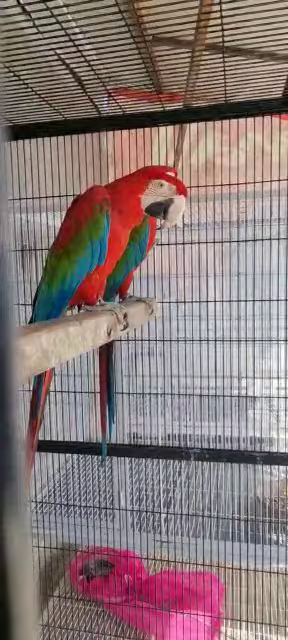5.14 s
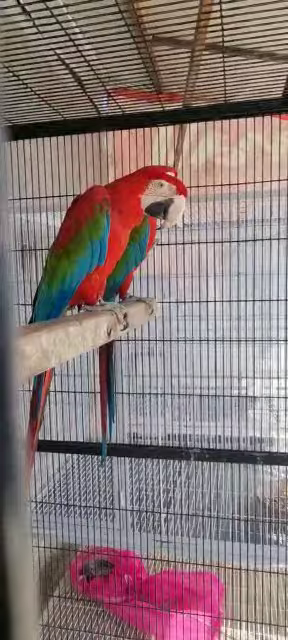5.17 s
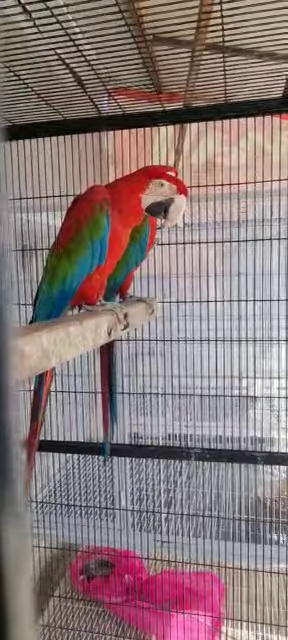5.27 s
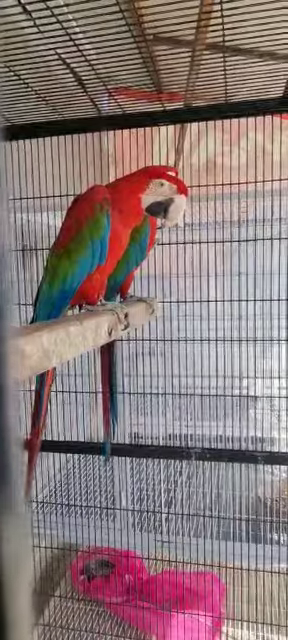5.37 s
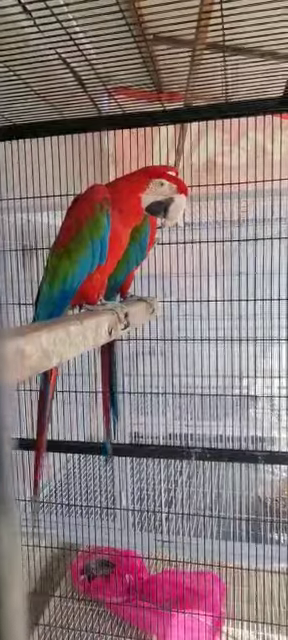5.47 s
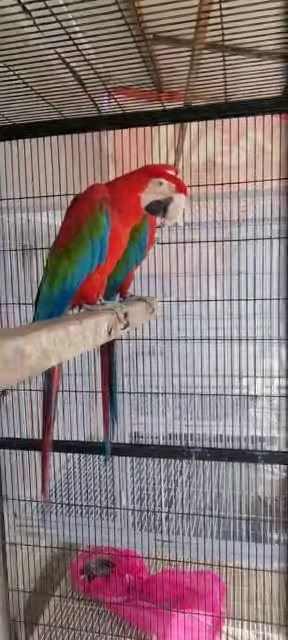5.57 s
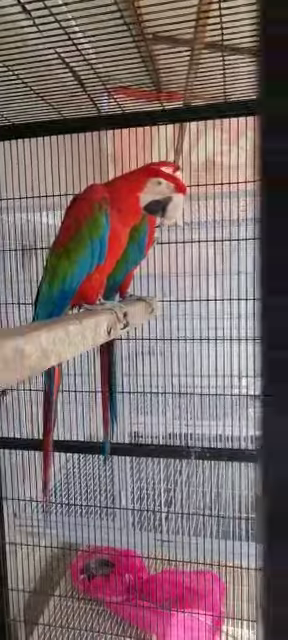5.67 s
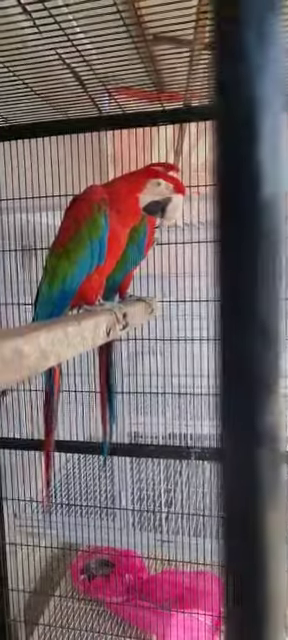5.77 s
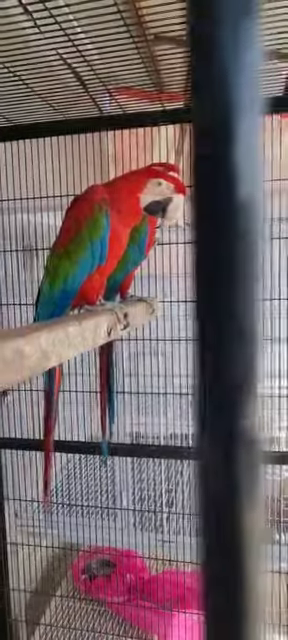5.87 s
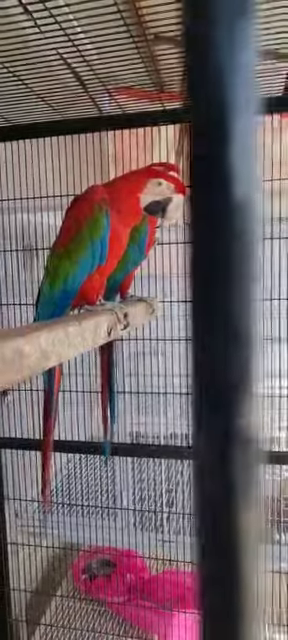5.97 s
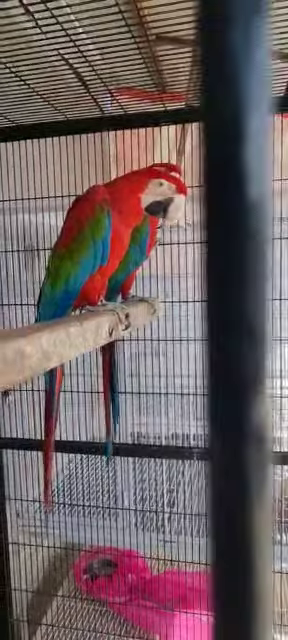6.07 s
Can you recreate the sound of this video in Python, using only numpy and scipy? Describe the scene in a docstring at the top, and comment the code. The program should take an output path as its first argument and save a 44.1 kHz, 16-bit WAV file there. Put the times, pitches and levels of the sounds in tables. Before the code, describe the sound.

Quiet ticks and scrapes on cage wire open the scene, then two harsh macaw screeches ring off the walls. Low throaty barks erupt near the microphone, three quick screeches follow, and three spaced, forced rasps burst and fade. Hoarse distant caws and growls thicken toward the end, with a thin fast trill. Steady low air and an unsteady hum lie underneath, in stereo.

```python
"""Macaws call in a hard-walled aviary: unstable syrinx tones, coloured by the throat, slide down in pitch as they swell.
Later screeches burst from a thin note into a rasp, where the tone gives way to noise pulsing once a cycle.
One bird barks low and loud close by; others croon, caw, whistle and growl farther off.
Beaks and claws scrape the wire as short filtered noise, a small bird trills faintly on sine tones,
and ventilation is coloured noise with a low, unsteady hum."""
import sys
import numpy as np
from scipy import signal
from scipy.fft import rfft, irfft, next_fast_len
from scipy.io import wavfile
from scipy.ndimage import uniform_filter1d, minimum_filter1d, map_coordinates

SR = 44100
rng = np.random.default_rng(int(sys.argv[2]) if len(sys.argv) > 2 else 0)


def file_out(sig):
    """Save sig as 16-bit WAV at sys.argv[1]."""
    # one column per channel
    cols = np.atleast_2d(sig).T
    # limit, then scale
    lim = np.clip(cols, -1, 1)
    pcm = np.round(lim * 32767).astype(np.int16)
    wavfile.write(sys.argv[1], SR, pcm)


N = 270769
TIME = np.arange(N) / SR
TOP_HZ = 15780  # band limit

# Call levels are set before flutter, room and ports; roughness runs from 0 (clean) to 1 (chaotic).
# Screeches that slide down and swell: (time [s], length [s], swell [s], peak level [dB], settled pitch [Hz],
# slide from above [Hz], roughness approached after the break [0-1], odd harmonics [dB],
# brightness [dB per octave], left over right [dB])
SCREECHES = [ (1.138, 0.19, 0.13, -18.5, 1275, 482.7, 0.9, -5.5, 4, 0),
             (1.471, .21, 0.11, -18, 1288, 341, 0.8, -6, 3, 0),
             (2.581, .21, 0.092, -20.5, 1318, 111, 0.83, 0.5, 5, 0),
             (2.82, 0.12, 0.092, -24.5, 1292, 857, 0.2, -22, -3.5, 0),
             (2.967, 0.264, 0.1, -21, 1249, 377.5, 0.53, -5, 4, -1),
             (5.303, 0.363, 0.31, -34, 1359, 100, 0.34, -2, -4.5, 0)]
SLIDE_S = .038  # time to slide half way [s]
SWELL_DB, FADE_DB_PER_S = 9, 90  # rise to the peak [dB], fall after it [dB/s]
START_ROUGH = 0.062  # roughness before the break [0-1]
BREAK_AT, BREAK_SHARPNESS = 0.863, 3.14  # middle of the break [share of the swell], its abruptness

# Screeches forced into a rasp: (time of the break [s], length after it [s], peak level [dB], fade [dB/s],
# settled pitch [Hz], odd harmonics [dB], brightness [dB per octave], left over right [dB])
RASPS = [ (3.495, 0.39, -21, 47, 1322, -22, 1, 1.5), (4.188, 0.36, -18.5, 54.5, 1325, -8, 0, 1),
         (4.902, 0.38, -19.5, 36.5, 1322, -9, 1.5, 0)]
# The thin lead note: length [s], level against the rasp [dB], slide from above [Hz]
LEAD_S, LEAD_DB, LEAD_SLIDE_HZ = 0.029, -13.5, 244.7
BURST_S, ROUGHEN_S = 0.0077, 0.033  # time constants of the burst and of the turn to noise [s]

# Gliding calls, all with the same columns: (time [s], length [s], peak level [dB], first pitch [Hz],
# last pitch [Hz], roughness [0-1])
# Close barks
SQUAWKS = [(2.23, 0.16, -22, 490, 587.5, 0.8), (2.345, .13, -11, 600, 509.4, 0.24),
           (2.46, .08, -9, 682.3, 523.7, 0.62)]
# Distant soft, low calls, columns as above
CROONS = [(1.42, 0.6, -43, 295.8, 352.5, 0.41), (1.94, 0.24, -28, 364.8, 316.2, 0.17),
          (2.12, .23, -34, 342.4, 405.7, 0.6), (4.64, 0.2, -41.5, 392, 325, 0.15)]
# Distant hoarse calls, columns as above; the first row is the second harmonic of the croon at 4.64 s, voiced
# through the caws' throat
CAWS = [(4.64, 0.32, -36.5, 745, 630, 0.41), (4.92, 0.41, -27, 531.6, 570, 0.58),
        (5.24, .43, -28.5, 582.4, 530, 0.66), (6.08, 0.067, -25, 539, 470, 0.6)]
# Distant high, breathy calls, columns as above
WHISTLES = [(-.08, 0.168, -36, 1471, 1416, 0.6), (3.88, .34, -35.5, 1492, 1436, 0.6)]

# Throat colour of the screeches: (frequency [Hz], relative level [dB])
SCREECH_THROAT = [(600, -34), (1050, -10), (1420, -5), (1700, -7), (2020, 10), (2300, -0.5), (2720, 7.5),
                  (3050, -5), (3550, -1), (4200, -9.5), (4900, -14), (5600, -12.5), (6300, -19),
                  (7300, -24), (8300, -43.5), (10500, -44.5), (13000, -32.5), (16000, -54.5)]
# Throat colour of the rasps: (frequency [Hz], relative level [dB])
RASP_THROAT = [(600, -43), (1100, -32), (1420, 0), (1700, -6.5), (2020, 7), (2300, 6), (2720, 5.5),
               (3000, 5), (3500, -3.5), (4200, -9), (4900, -11), (5600, -10.5), (6300, -8.5), (7200, -17),
               (8300, -44.5), (10500, -35.5), (13000, -39), (16000, -48.5)]
# Throat colour of the squawks: (frequency [Hz], relative level [dB])
SQUAWK_THROAT = [(150, -34), (350, -9.5), (560, -16), (800, 0.5), (1130, -1), (1600, -6), (2200, -2),
                 (2650, -6), (3200, -6), (3700, -19), (4200, -21.5), (5200, -23.5), (6600, -20.5),
                 (8300, -36.5), (13000, -23.5), (16000, -45.5)]
# Throat colour of the croons: (frequency [Hz], relative level [dB])
CROON_THROAT = [(200, -21.5), (350, -2.5), (500, 0.5), (720, -12), (1020, 4), (1300, -28), (1600, -9.5),
                (2200, -24.5), (2800, -10.5), (4000, -39), (8000, -24.5)]
# Throat colour of the caws: (frequency [Hz], relative level [dB])
CAW_THROAT = [(250, -37.5), (560, -2), (800, 3.5), (1100, 9), (1350, -0.5), (1650, -3.5), (2200, -31.5),
              (2750, -10), (3100, -5), (3500, -19), (4100, -11.5), (4800, -30), (8000, -39.5)]
# Throat colour of the whistles: (frequency [Hz], relative level [dB])
WHISTLE_THROAT = [(700, -16), (1400, 0.5), (2300, -18.5), (6000, -26)]

# Growls through a wide beak: (time [s], length [s], peak level before the room [dB])
GROWLS = [(0.83, 0.27, -47), (2.022, 0.34, -30.5), (3.473, 0.45, -33.5), (4.23, 0.4, -34),
          (4.67, 0.34, -31), (4.894, 0.91, -28), (5.23, 0.37, -25), (5.741, 0.018, -32.5)]
# The flock's grumble through nearly shut beaks: (time [s], level before the room [dB])
GRUMBLE = [(.8, -63), (1.4, -42), (3.4, -39.5), (4.1, -47), (5.6, -38.5), (6.14, -42.5)]
# Growl resonances, beak wide, per pass: (centre [Hz], width [Hz], relative level [dB])
BEAK_WIDE = [(522, 260, -4), (1223, 290, 6), (1671, 200, 5), (2660, 470, 4), (4010, 330, -0.5),
             (5180, 420, -2)]
# Growl resonances, beak nearly shut, per pass: (centre [Hz], width [Hz], relative level [dB])
BEAK_NARROW = [(260, 180, -2), (525.4, 213, 3), (1135, 640, 5), (1512, 440, 6.5), (2620, 600, -5),
               (4000, 1400, -27), (5200, 500, -6.5)]

# Scrapes on the wire: (time [s], fade time [s], low ring before the room [dB], bright hiss before the room [dB])
SCRAPES = [(0.039, .1, -50, -62), (0.182, 0.12, -51, -57.5), (0.31, 0.028, -38.5, -47),
           (0.629, 0.022, -43.5, -53), (0.671, 0.079, -41.5, -39.5), (0.812, 0.14, -42.5, -66.5),
           (1.892, 0.055, -38.5, -55), (2.029, 0.066, -46.5, -47), (2.192, 0.029, -34.5, -40),
           (2.284, 0.025, -36.5, -63), (2.848, 0.02, -25.5, -44), (3.221, 0.12, -46.5, -56),
           (3.463, 0.027, -38, -43.5), (3.815, 0.085, -36, -39), (3.872, 0.025, -27.5, -36.5),
           (4.112, 0.012, -42, -48.5), (4.278, 0.087, -33, -49), (5.636, 0.0048, -36, -45.5)]
# Colour of the wire's low ring: (frequency [Hz], relative level [dB])
WIRE_RING = [(600, -88), (2000, -2), (3800, -4), (5700, 2), (7300, -1.5), (8500, -23.5), (16000, -53)]
# Colour of the wire's bright hiss: (frequency [Hz], relative level [dB])
WIRE_HISS = [(4000, -77.5), (8000, 0.5), (11000, 5.5), (14000, 10.5), (16000, 5.5)]

# Loudness of the small bird's trill: (time [s], level before the room [dB])
TRILL = [(4.55, -66), (4.68, -51.5), (5.2, -63), (5.5, -71), (5.72, -48.5), (6.14, -57)]

# Colour of the ventilation: (frequency [Hz], relative level [dB])
AIR = [(12, -60.5), (30, -18), (55, -2), (100, -4), (150, -7.5), (290, -4), (450, -8.5), (750, -12.5),
       (1200, -8.5), (2000, -15.5), (4500, -22), (7000, -25), (9000, -44), (15500, -28)]
# Width of the ventilation: (frequency [Hz], left-right likeness [0-1])
AIR_ALIKE = [(30, 0.55), (80, 0.86), (200, 0.98), (400, 0), (8000, 0)]

# Decay of the room by 60 dB: (frequency [Hz], time [s])
ROOM_T60 = [(200, 0.71), (1000, 0.44), (3000, 0.59), (6000, 0.46), (13000, 0.11)]
# Width of the room's answer: (frequency [Hz], left-right likeness [0-1])
ROOM_ALIKE = [(200, 0.47), (1400, 0.25), (3000, 0.014), (6000, 0)]
# Phase between the microphone ports: (frequency [Hz], left lead [rad])
PORT_PHASE = [(330, 0.75), (520, 1.77), (1250, 2.14), (2300, 1.19), (2900, 2.14), (4000, 1.35),
              (9000, 1.68)]
# Balance between the microphone ports: (frequency [Hz], left over right [dB])
PORT_BALANCE = [(200, -1), (1400, -3.5), (2800, 0.5), (5200, -5.5), (7000, -1), (9000, 3.5), (15000, 0)]


def amp(db):
    """Decibels to gain."""
    return 10 ** (np.asarray(db) / 20)


def unit(x):
    """Scale to rms 1."""
    return x / np.sqrt(np.mean(x ** 2) + 1e-20)


def along(points, hz):
    """Read (Hz, value) points on a log axis."""
    f, v = np.transpose(points)
    return np.interp(np.log(hz + 1), np.log(f + 1), v)


def curves(rows, t):
    """Each column after the time, read at times t."""
    s, *cols = np.transpose(rows)
    return [np.interp(t, s, c) for c in cols]


def wobble(rate, size):
    """A smooth random curve with rate knots a second."""
    knots = rng.standard_normal(2048)
    return map_coordinates(knots, [np.arange(size) * rate / SR], mode="wrap")


def filtered(x, response):
    """x through a complex response of frequency."""
    m = next_fast_len(x.shape[-1] + 8192)
    spectrum = rfft(x, m) * response(np.fft.rfftfreq(m, 1 / SR))
    return irfft(spectrum, m)[..., :x.shape[-1]]


def coloured(x, spectrum):
    """x with a (Hz, dB) colour, at rms 1."""
    return unit(filtered(x, lambda hz: amp(along(spectrum, hz))))


def resonated(x, modes):
    """x twice through a set of resonances, for dark valleys between them; at rms 1."""
    def once(f):
        total = 0
        for k, (centre, width, db) in enumerate(modes):
            peak = 1j * f * width / (centre * centre - f * f + 1j * f * width)
            total = total + (-1) ** k * amp(db) * peak  # neighbours in opposite sign
        return total
    return unit(filtered(x, lambda f: once(f) ** 2))


def noise_pair(alike, size):
    """Left and right noise, partly shared."""
    def weights(hz):
        turn = np.arccos(np.clip(along(alike, hz), -1, 1)) / 2
        return np.array([np.cos(turn), np.sin(turn)])
    mid, side = filtered(rng.standard_normal((2, size)), weights)
    return np.array([mid + side, mid - side])


def panned(x, pan_db):
    """x in two channels, the left louder by pan_db."""
    return amp([[pan_db / 2], [-pan_db / 2]]) * x


def slide(age):
    """The share of its downward slide that a call still has before it: fast at first, then settling."""
    return 1 / (1 + age / SLIDE_S)


def arch(progress, droop_db):
    """Level in dB of a call that peaks midway and is droop_db lower at both ends."""
    return -droop_db * (2 * progress - 1) ** 2


def call(t, pitch, db, rough, throat, jitter, rasp, flutter_db, count,
         odd_db=0, bright_db=0, flap_rate=110, flap_db=6):
    """One call over times t: a syrinx tone that, pushed hard, splits into thirds of its pitch and turns chaotic."""
    size = len(t)
    rough = np.clip(rough, 0, 1)
    rough_waver = wobble(600, size) + 0.385 * wobble(69.75, size)
    waver = 0.0081 * wobble(120.2, size) + jitter * rough * rough_waver
    phase = 2 * np.pi * np.cumsum(pitch * (1 + waver)) / SR

    # high harmonics build up later
    k = np.arange(1, count + 1)[:, None]
    build = 1 - np.exp(-(t - t[0]) / (.007 * (k * pitch / 3000) ** 3))
    strength = build * amp(odd_db * (k % 2)) * (k * pitch < TOP_HZ)

    # the membranes flap unevenly: each harmonic swells and slips on its own, slipping more the higher it is
    flaps = np.array([[wobble(flap_rate, size) for _ in k] for _ in range(2)])
    swell, slip = np.sqrt(rough) * flaps
    lag = 2 * np.pi * rng.random((count, 1)) + (.6 + .12 * k) * slip
    tone = unit(np.sum(strength * amp(flap_db * swell) * np.cos(k * phase + lag), axis=0))
    # beating at two thirds of the pitch puts partials between the harmonics
    tone *= 1 + np.sqrt(rough) * np.clip(4 * rough, 0, 1) * np.cos(phase * 2 / 3)

    # air bursts through once a cycle
    breath = np.resize(rng.standard_normal(SR), size)
    chaos = unit(breath * (1 + .5 * np.cos(phase)))
    share = np.clip(rasp * rough ** 2, 0, 1)
    source = np.sqrt(1 - share) * tone + np.sqrt(share) * chaos

    colour = [(hz, level + bright_db * np.log2(hz / throat[0][0])) for hz, level in throat]
    voice = coloured(source, colour)
    voice /= np.sqrt(np.abs(uniform_filter1d(voice ** 2, size=900)) + 1e-6)  # even out the level

    # the rasp comes in uneven puffs
    puffs = amp(flutter_db * np.sqrt(rough) * (wobble(191.8, size) - 0.91))
    gate = np.clip((t - t[0]) / .002, 0, 1) * np.clip((t[-1] - t) / .02, 0, 1)
    heard = (voice * puffs * gate * amp(db))[t >= 0]
    return np.pad(heard, (max(round(t[0] * SR), 0), N))[:N]


def glides(rows, throat, droop_db, **voice):
    """Short calls that swell and sink while their pitch glides evenly."""
    out = np.zeros(N)
    for s, length, db, first_hz, last_hz, rough in rows:
        age = np.arange(0, length, 1 / SR)
        pitch = first_hz + (last_hz - first_hz) * age / length
        level = db + arch(age / length, droop_db)
        out += call(s + age, pitch, level, rough, throat, **voice)
    return out


def ventilation():
    """Steady moving air as coloured noise, with a low hum that wavers in pitch and level."""
    hum_phase = 2 * np.pi * np.cumsum(77 + 3 * wobble(15, N)) / SR
    hum = np.sin(hum_phase) * amp(3.5 * wobble(14, N))
    air = coloured(noise_pair(AIR_ALIKE, N), AIR)
    return amp(-52.0) * air + amp(-60.5) * hum


def far_calls():
    """Farther birds croon, caw and whistle: one syrinx model through three throats."""
    croons = glides(CROONS, CROON_THROAT, droop_db=6, jitter=.04, rasp=.25, flutter_db=4, count=16)
    caws = glides(CAWS, CAW_THROAT, droop_db=7, jitter=.08, rasp=.5, flutter_db=3.5, count=12)
    whistles = glides(WHISTLES, WHISTLE_THROAT, droop_db=12.5, jitter=0.085, rasp=1.0, flutter_db=4, count=3)
    return croons + caws + whistles


def growling():
    """Uneven low pulses of noise: a grumble through nearly shut beaks, and growls through wide ones."""
    phase = 2 * np.pi * np.cumsum(130 * (1 + 0.22 * wobble(90, N))) / SR
    pulses = rng.standard_normal(N) * np.exp(np.cos(phase)) * amp(1.5 * wobble(45, N))
    pulses = coloured(pulses, [(100, -4.5), (280, 6.0), (5500, -13), (8500, -11)])
    swells = [amp(db + arch((TIME - s) / length, droop_db=9.5)) for s, length, db in GROWLS]
    growls = np.max(swells, axis=0)  # the loudest growl leads
    grumble = amp(curves(GRUMBLE, TIME)[0])
    return growls * resonated(pulses, BEAK_WIDE) + grumble * resonated(pulses, BEAK_NARROW)


def scrapes():
    """Beaks and claws catch on the wire and slide off in tiny slips: noise through a ring and a hiss."""
    out = np.zeros(N + SR)
    t = np.arange(SR // 3) / SR
    for s, length, ring_db, hiss_db in SCRAPES:
        slips = rng.standard_normal(len(t)) * amp(3.4 * wobble(500, len(t)))
        stroke = (1 - np.exp(-t / .002)) * np.exp(-(t / length) ** 2)
        ring = amp(ring_db) * coloured(slips, WIRE_RING)
        hiss = amp(hiss_db) * coloured(slips, WIRE_HISS)
        out[round(s * SR):][:len(t)] += stroke * (ring + hiss)
    return out[:N]


def screeches():
    """High screeches from a strained syrinx: they slide down, swell, roughen near the peak and fade."""
    out = np.zeros((2, N))
    for s, length, swell_s, db, hz, slide_hz, final_rough, odd_db, bright_db, pan_db in SCREECHES:
        age = np.arange(0, length, 1 / SR)
        rise = -SWELL_DB * np.maximum(1 - age / swell_s, 0) ** 2
        fall = -FADE_DB_PER_S * np.maximum(age - swell_s, 0)
        strain = (age / (BREAK_AT * swell_s)) ** BREAK_SHARPNESS
        rough = (START_ROUGH + final_rough * strain) / (1 + strain)
        voice = call(s + age, hz + slide_hz * slide(age), db + rise + fall, rough, SCREECH_THROAT,
                     jitter=.055, rasp=.9, flutter_db=2.5, count=10, odd_db=odd_db, bright_db=bright_db)
        out += panned(voice, pan_db)
    return out


def squawks():
    """The close bird's low, open-beaked barks; their partials break up and trade strength."""
    return glides(SQUAWKS, SQUAWK_THROAT, droop_db=8, jitter=.06, rasp=.7, flutter_db=2.5, count=28,
                  odd_db=-3, flap_rate=45, flap_db=10)


def rasps():
    """The screeching voice forced: a thin lead note bursts into a long, fading rasp."""
    out = np.zeros((2, N))
    for s, length, db, fade_db_per_s, hz, odd_db, bright_db, pan_db in RASPS:
        age = np.arange(-LEAD_S, length, 1 / SR)
        since_break = np.maximum(age, 0)
        burst = (1 + np.tanh(age / BURST_S)) / 2
        level = db + (1 - burst) * LEAD_DB - fade_db_per_s * since_break
        rough = 1 - np.exp(-since_break / ROUGHEN_S)
        pitch = hz + LEAD_SLIDE_HZ * slide(age + LEAD_S)
        voice = call(s + age, pitch, level, rough, RASP_THROAT,
                     jitter=.07, rasp=.75, flutter_db=2.8, count=10, odd_db=odd_db, bright_db=bright_db)
        out += panned(voice, pan_db)
    return out


def trill():
    """A small bird's thin, fast trill: two wavering sine notes together, pulsing about 17 times a second."""
    beat = amp(8 * np.cos(2 * np.pi * np.cumsum(17 + wobble(5, N)) / SR))
    notes = np.zeros(N)
    for hz, db in [(6550, 10.3), (5390, 4.3)]:
        pitch = hz * (1 + 0.018 * wobble(900, N))
        notes += amp(db) * np.sin(2 * np.pi * np.cumsum(pitch) / SR)
    return amp(curves(TRILL, TIME)[0]) * unit(beat * notes) * (TIME > TRILL[0][0])


def aviary(x, direct_db, wet_db):
    """Direct sound plus the walls' answer, a noise tail carrying the same energy in every band."""
    hz, t, z = signal.stft(noise_pair(ROOM_ALIKE, SR), SR, nperseg=256)
    z = z * amp(-60 * t / along(ROOM_T60, hz)[:, None]) * (t > 0)
    z = z / np.linalg.norm(z, axis=2, keepdims=True)
    tail = signal.istft(z, SR, nperseg=256)[1]
    wet = signal.fftconvolve(np.atleast_2d(x), tail / np.linalg.norm(tail[0]), axes=1)[:, :N]
    return amp(direct_db) * x + amp(wet_db) * wet


def ports(hz):
    """The two microphone ports hear the birds at different phase and strength."""
    half = amp(along(PORT_BALANCE, hz) / 2) * np.exp(1j * along(PORT_PHASE, hz) / 2)
    return np.array([half, 1 / half])


def scene():
    """Each source at its own distance in the aviary, set by its direct and wet levels."""
    birds = aviary(screeches() + rasps(), direct_db=-0.5, wet_db=2.5)
    birds += aviary(squawks(), direct_db=0, wet_db=-7)
    birds += aviary(far_calls() + growling(), direct_db=-1.5, wet_db=-2.5)
    birds += aviary(scrapes(), direct_db=-4.5, wet_db=-2.5)
    birds += aviary(trill(), direct_db=-3.5, wet_db=-9.5)
    return filtered(birds, ports) + ventilation()


def record(dry):
    """A fast limiter holds the peaks; nothing is kept above the band limit."""
    needed = np.minimum(1, .95 / (np.abs(dry).max(axis=0) + 1e-9))
    gain = uniform_filter1d(minimum_filter1d(needed, size=400), size=400)
    return filtered(dry * gain, lambda hz: hz < TOP_HZ)


dry = scene()
out = record(dry)
file_out(out)
```